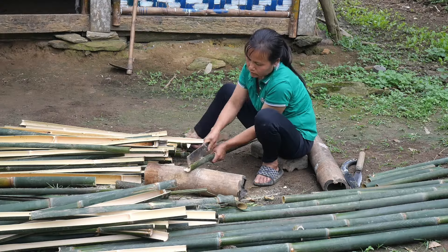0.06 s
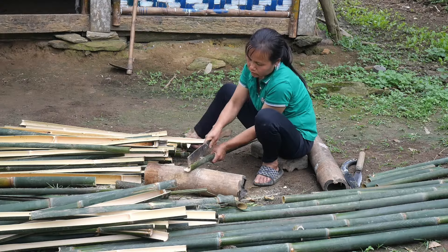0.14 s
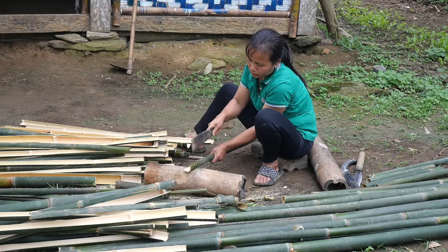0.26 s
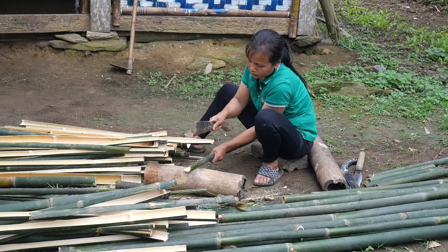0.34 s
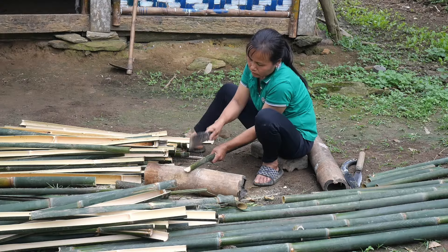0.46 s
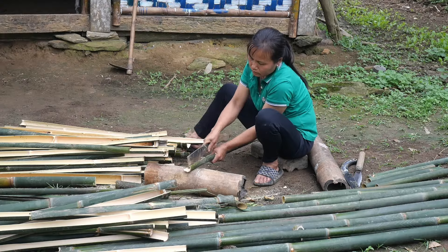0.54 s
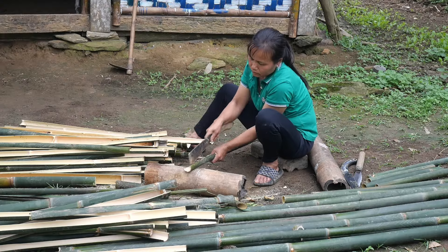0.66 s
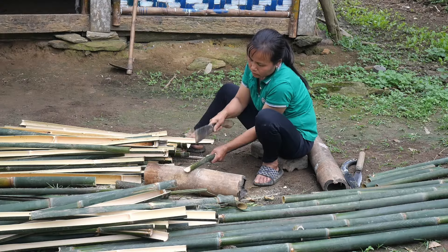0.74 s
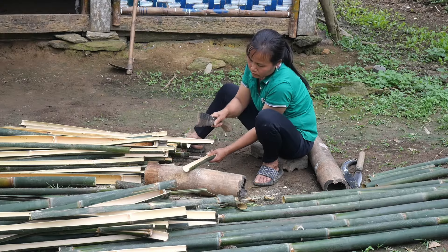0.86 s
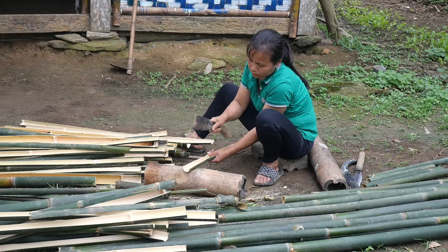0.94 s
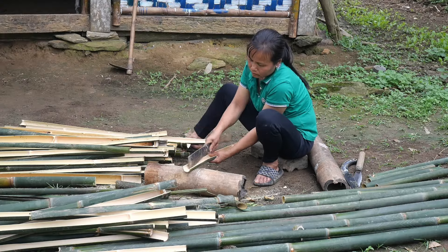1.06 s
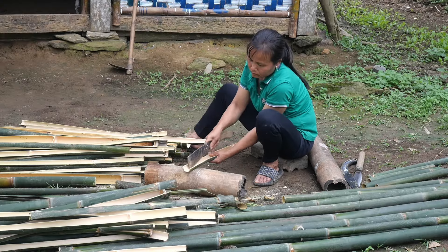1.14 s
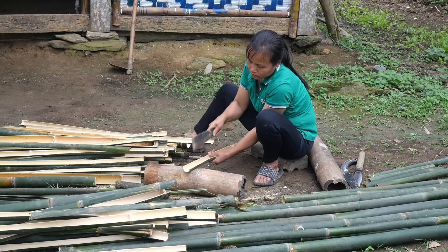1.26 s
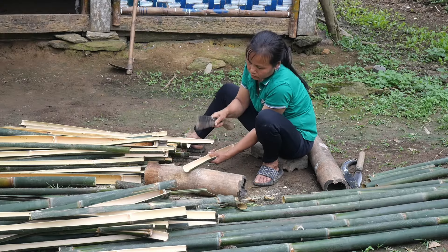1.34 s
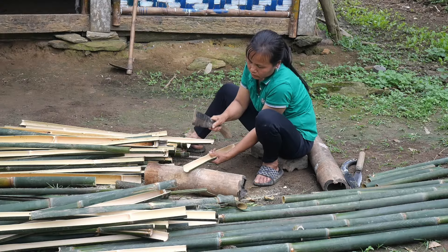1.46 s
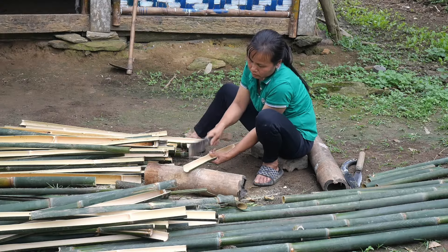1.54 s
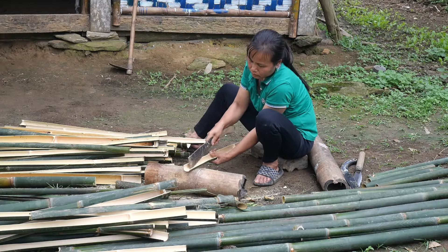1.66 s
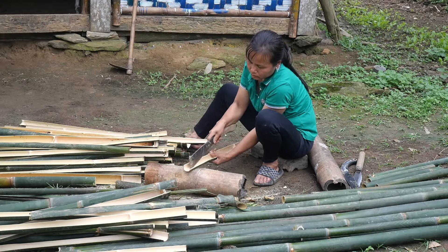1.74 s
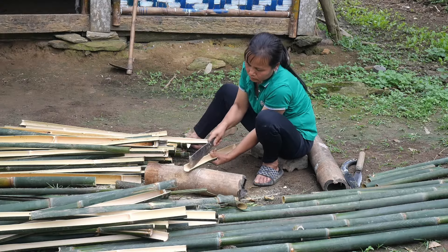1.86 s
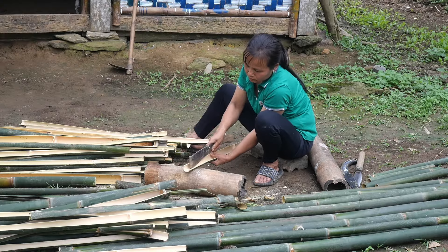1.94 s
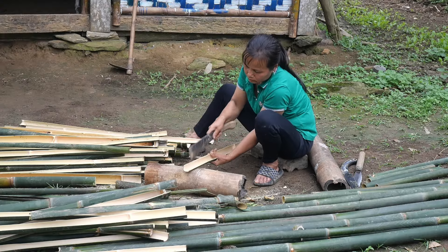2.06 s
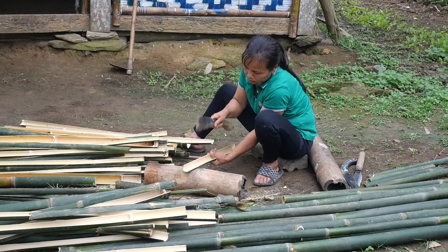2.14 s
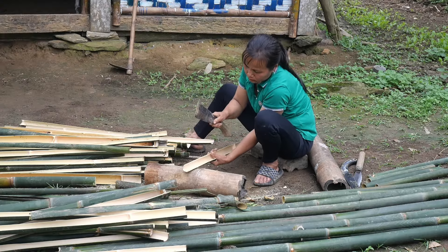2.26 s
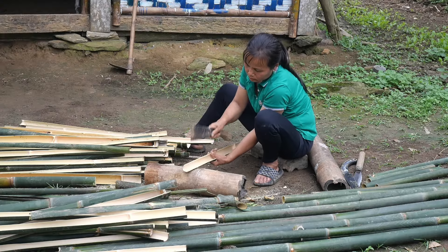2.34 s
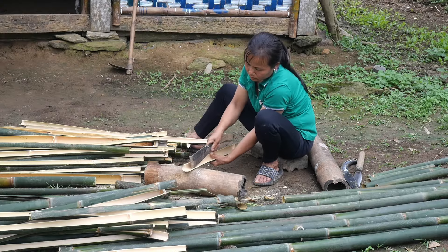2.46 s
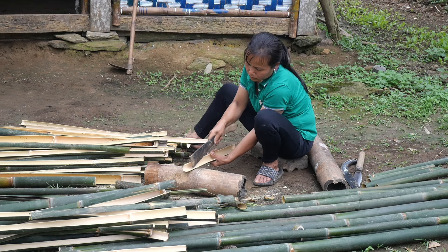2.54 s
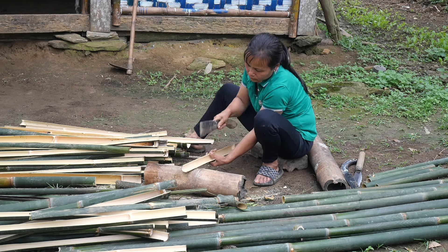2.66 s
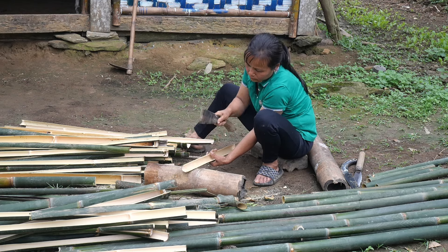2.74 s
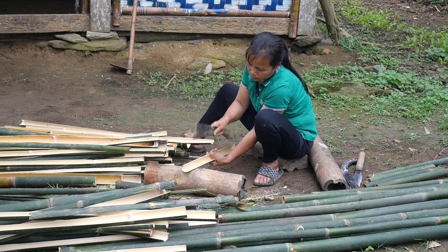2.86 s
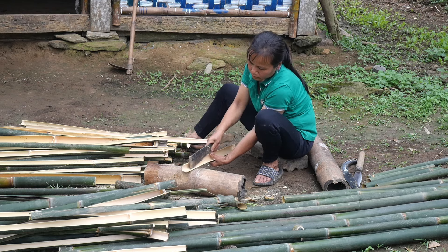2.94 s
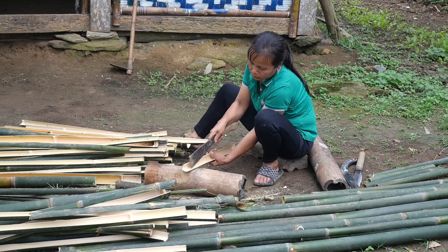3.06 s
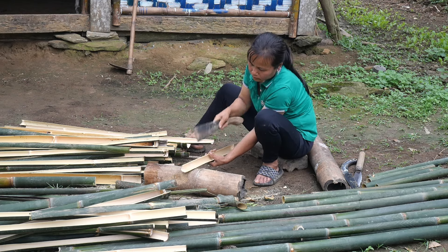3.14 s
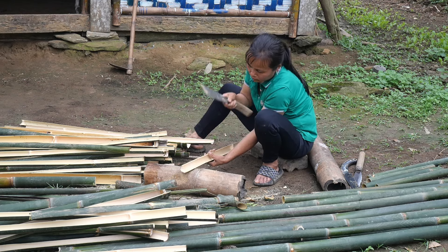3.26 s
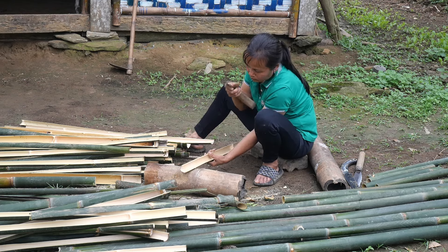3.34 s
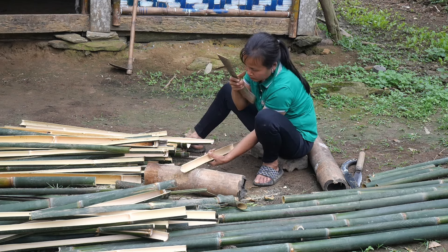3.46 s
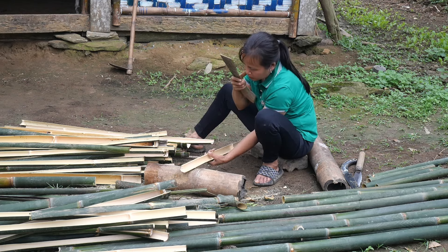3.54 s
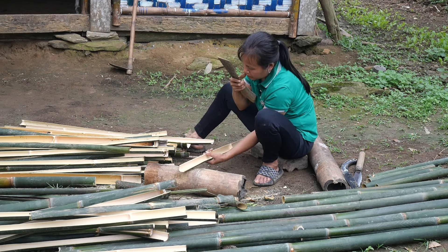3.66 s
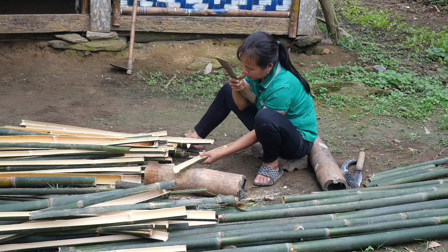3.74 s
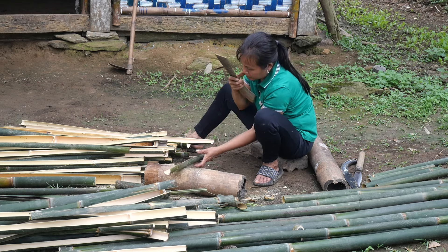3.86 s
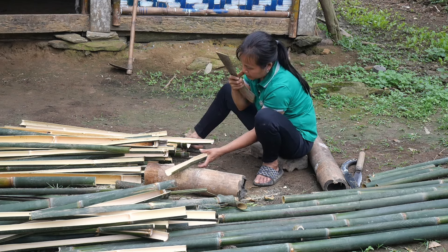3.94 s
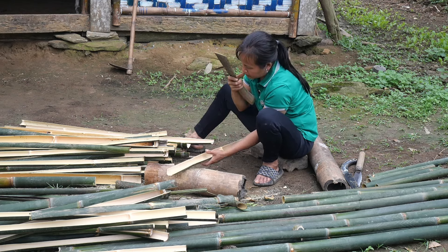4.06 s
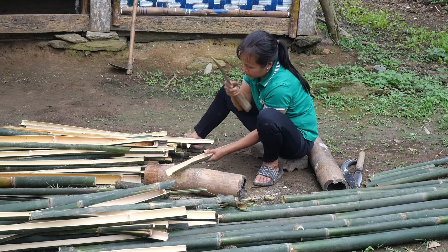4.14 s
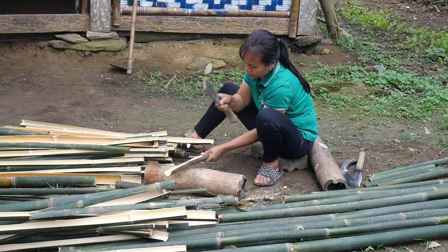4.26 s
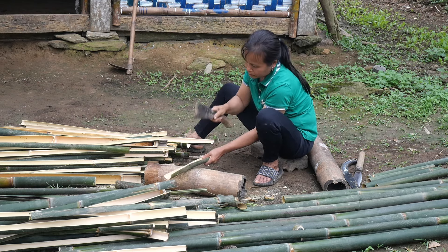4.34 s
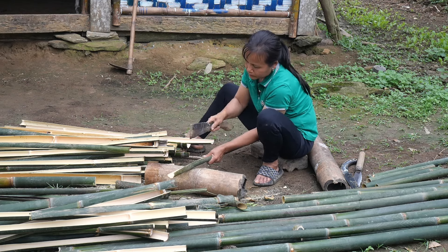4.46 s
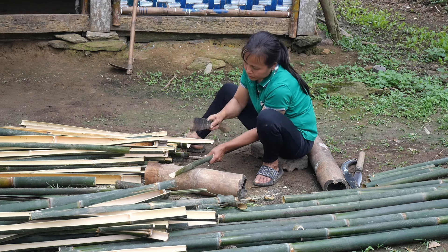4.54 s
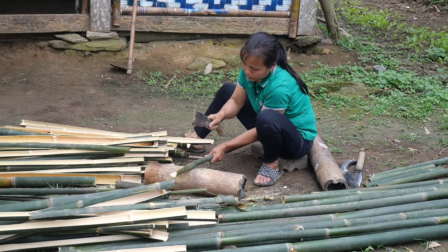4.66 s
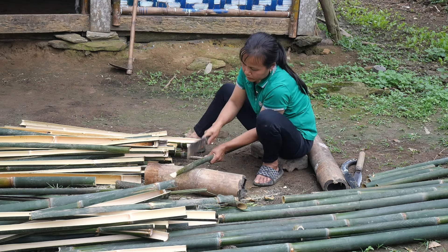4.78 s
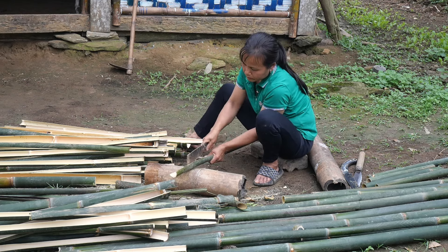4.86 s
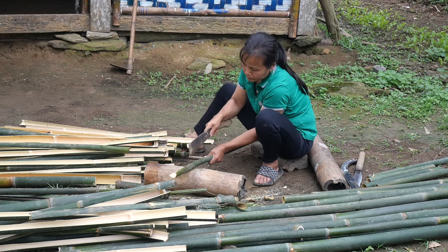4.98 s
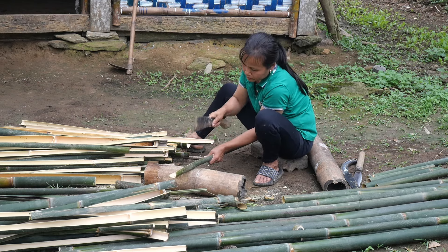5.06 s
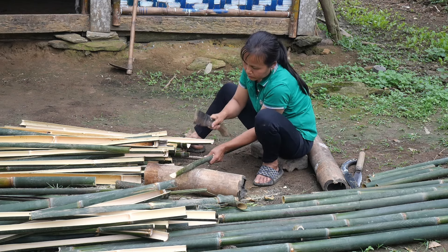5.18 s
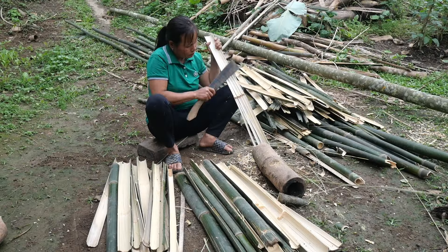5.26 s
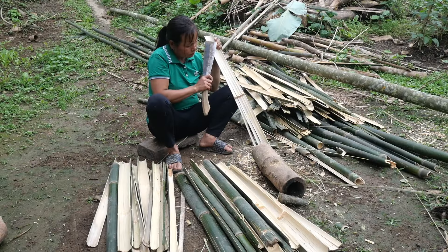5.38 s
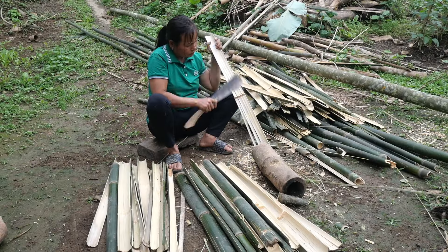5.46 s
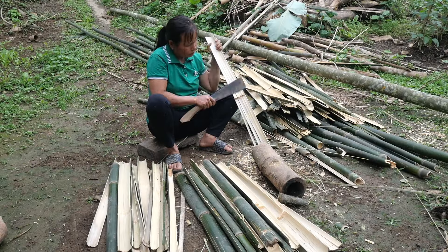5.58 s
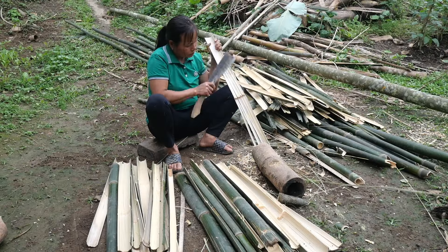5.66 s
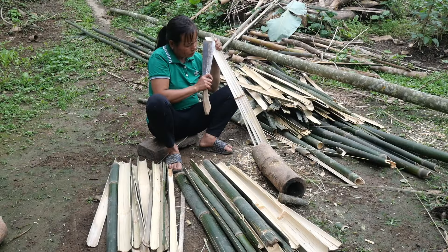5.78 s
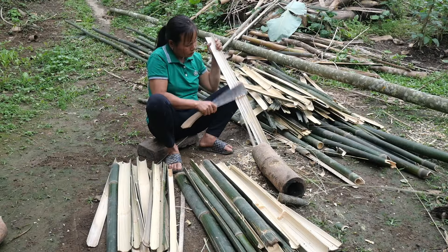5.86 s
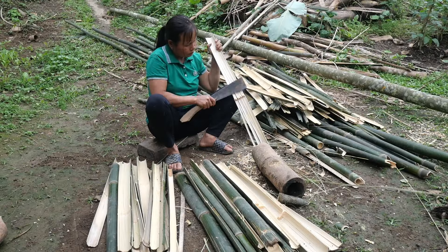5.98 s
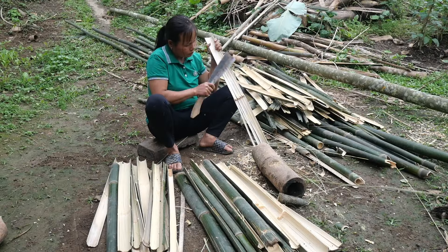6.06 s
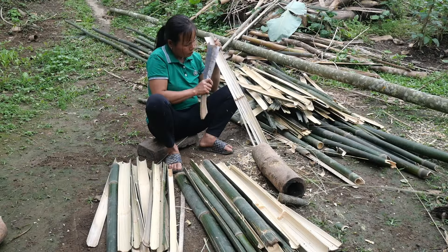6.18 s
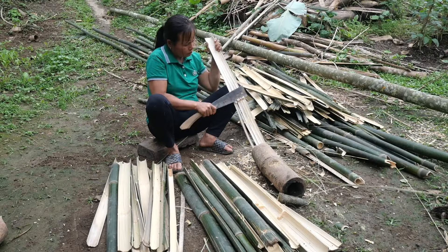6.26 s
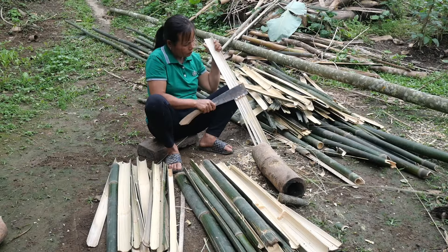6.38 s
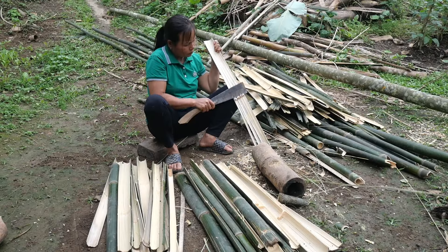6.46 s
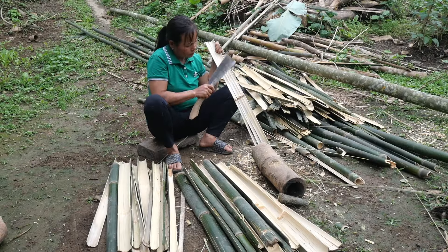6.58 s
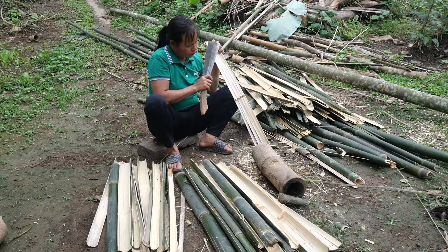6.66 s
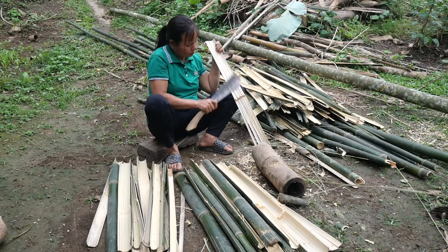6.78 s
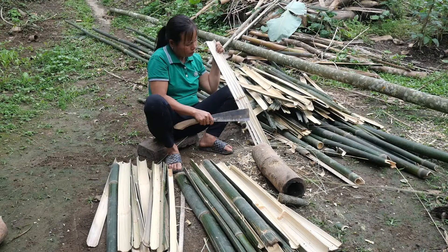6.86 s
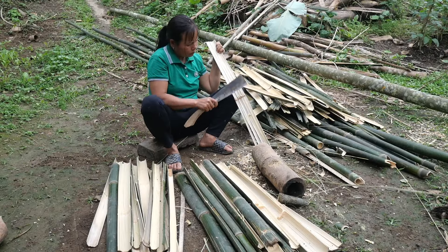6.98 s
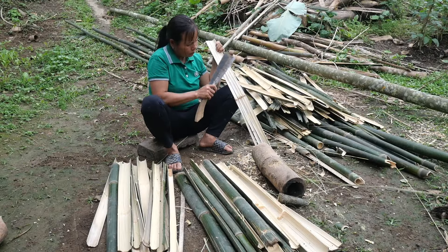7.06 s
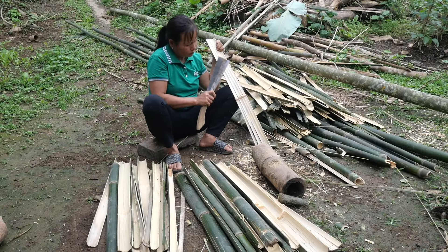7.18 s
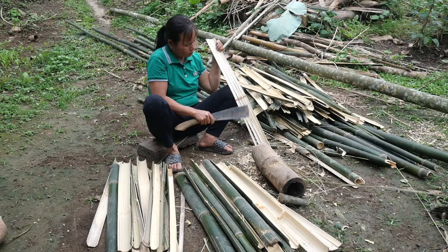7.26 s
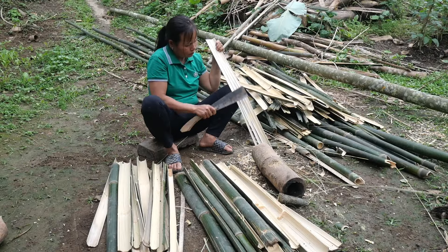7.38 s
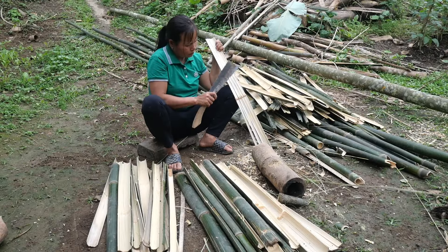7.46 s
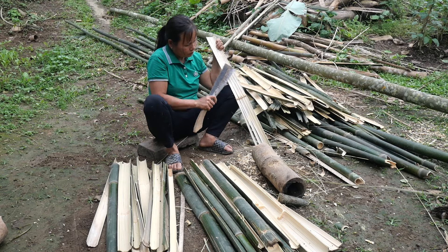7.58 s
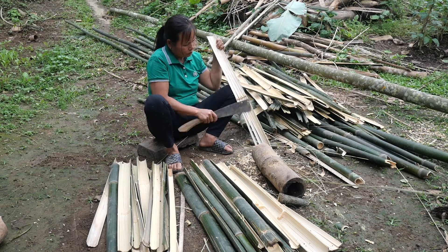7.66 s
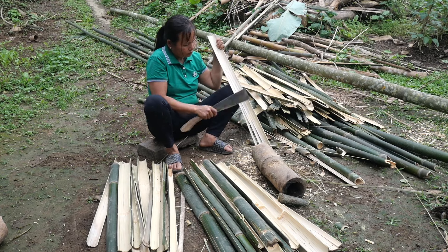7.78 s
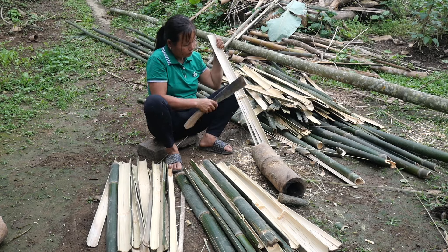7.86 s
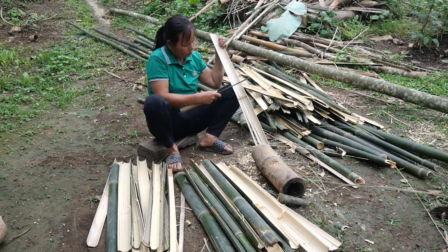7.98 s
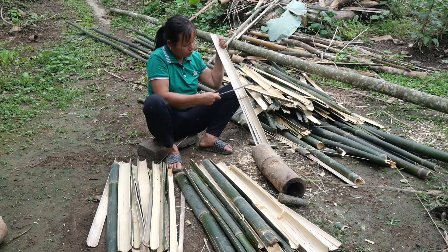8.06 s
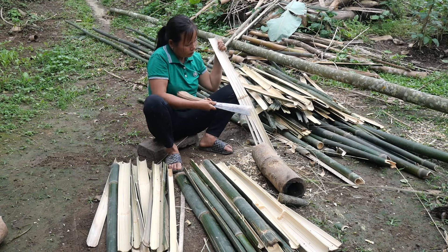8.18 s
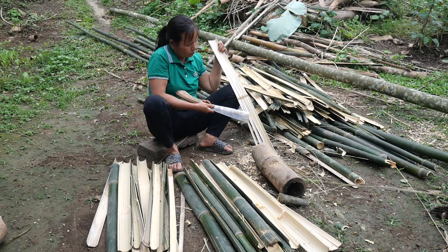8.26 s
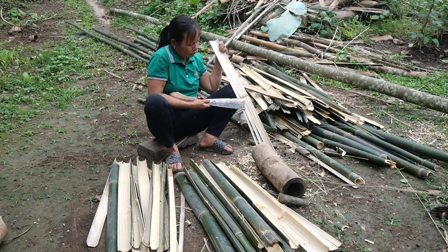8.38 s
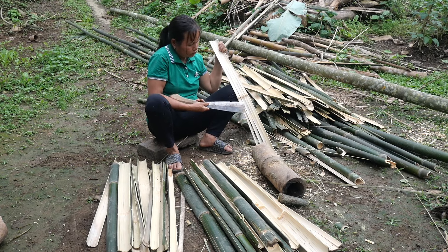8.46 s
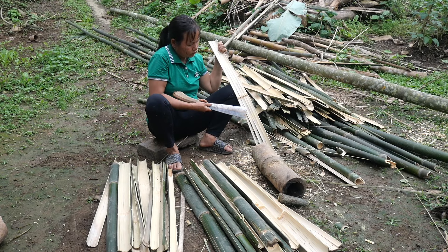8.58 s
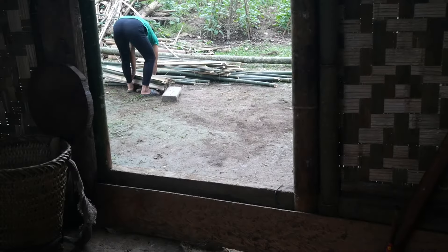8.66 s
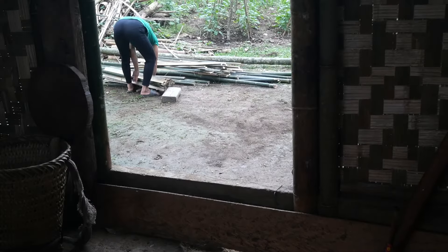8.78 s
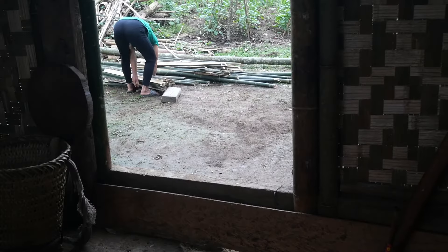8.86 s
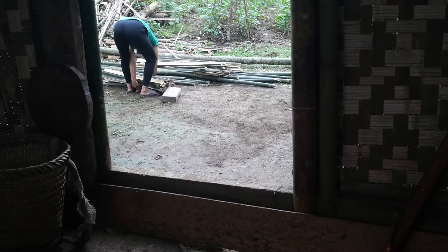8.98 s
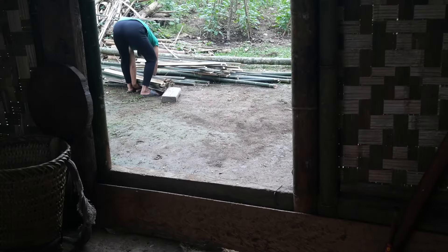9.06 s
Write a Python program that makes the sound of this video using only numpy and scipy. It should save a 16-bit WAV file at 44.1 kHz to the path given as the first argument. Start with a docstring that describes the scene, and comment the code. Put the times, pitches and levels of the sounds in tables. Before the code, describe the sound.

Firm bamboo chops with a short slap off a house front, near cricket chirps, then cane splitting amid insect hiss and a sudden quieter close.

```python
"""A bamboo slat is chopped on a hollow log; a house front slaps back each blow, a rooster and a bird call
far off, one cricket chirps near and another trills far away. From 5.5 s a standing cane is split under a
hissing insect chorus that is gone by 8.3 s; thin wavering tones last to 8.75 s, then a doorway's quiet air follows.
Blows are shaped noise (fibres), decaying sines (ring) and scattered noise (echo); gentler ones ring more.
Scrapes, taps and bumps are band-passed grains, callers gliding sines, air, chorus and tones filtered noise."""
import sys
import numpy as np
from scipy import signal
from scipy.fft import rfft, irfft, next_fast_len
from scipy.io import wavfile
from scipy.ndimage import uniform_filter1d

SR = 44100
rng = np.random.default_rng(int(sys.argv[2]) if len(sys.argv) > 2 else 0)


def file_out(sig):
    """Save sig as 16-bit WAV at sys.argv[1]."""
    # one column per channel
    cols = np.atleast_2d(sig).T
    # limit, then scale
    lim = np.clip(cols, -1, 1)
    pcm = np.round(lim * 32767).astype(np.int16)
    wavfile.write(sys.argv[1], SR, pcm)


N = 401751
T = np.arange(N) / SR
PILE_S, DOOR_S = 5.46, 8.865  # start of the cane pile's and the doorway's background


def amp(db):
    """Decibels to gain."""
    return 10 ** (np.asarray(db) / 20)


def unit(x):
    """Scale to rms 1."""
    return x / np.sqrt(np.mean(x ** 2))


def pan(db):
    """Left and right gains for a left-over-right level difference."""
    gains = amp(np.array([[db], [-db]]) / 2)
    return unit(gains)


def fade(t, t60):
    """Exponential decay from t = 0, 60 dB down after t60 seconds."""
    return (t >= 0) * amp(-60 * np.maximum(t, 0) / t60)


def between(start, end, ramp):
    """Gate with straight ramps, centred on start and end (s)."""
    return np.clip(np.minimum(T - start, end - T) / ramp + .5, 0, 1)


def colour(x, points):
    """Minimum-phase filter through (f/Hz, level/dB) points, by folding the cepstrum."""
    size = next_fast_len(x.shape[-1] + 2048, True) * 2
    point_hz, point_db = np.transpose(points)
    f = np.maximum(np.fft.rfftfreq(size, 1 / SR), 1)
    gain_db = np.interp(np.log(f), np.log(point_hz), point_db)
    cepstrum = irfft(np.log(amp(gain_db)))
    cepstrum[1:size // 2] *= 2
    cepstrum[size // 2 + 1:] = 0
    response = np.exp(rfft(cepstrum))
    return irfft(rfft(x, size) * response)[..., :x.shape[-1]]


def band(x, hz, width_hz):
    """One resonance, applied twice for steep skirts; width_hz is that of a single pass."""
    b, a = signal.iirpeak(min(hz, SR / 3), hz / min(width_hz, SR / 4), SR)
    return signal.lfilter(b, a, signal.lfilter(b, a, x))


def air(size, apart_hz):
    """Stereo noise: channels alike in the bass, ever less related above apart_hz."""
    mid, side = rfft(rng.standard_normal((2, size)))
    alike = np.clip(0.77 / (1 + (np.fft.rfftfreq(size, 1 / SR) / apart_hz) ** 2), 0, 1)
    mid, side = mid * np.sqrt(1 + alike), side * np.sqrt(1 - alike)
    return unit(irfft(np.array([mid + side, mid - side]), size))


def walk(rate_hz, size=N):
    """Random curve of rms near 1: new targets at rate_hz joined by straight lines."""
    k = max(int(SR / rate_hz), 1)
    steps = np.repeat(rng.standard_normal(size // k + 2), k)
    return unit(uniform_filter1d(steps, k))[:size]


def add(out, x, s):
    """Mix x into out at time s."""
    i = int(s * SR)
    a, b = max(i, 0), min(i + x.shape[-1], N)
    out[:, a:b] += x[..., a - i:b - i]


def chopping():
    """A slat cut on the log, about three metres from the house front."""
    # blows: t/s, level/dB, bite length/s, bass/dB, treble/dB
    chops = [(0.0795, -21, 0.0054, 2.5, 1), (0.5938, -21.5, 0.0072, 2, -0.5),
             (1.15, -20, 0.0045, -0.5, -.5), (1.6618, -23, 0.0073, 1.5, 2),
             (2.4945, -18, 0.0041, -4.5, -.5), (3.0148, -22.5, 0.0053, 0.5, 3),
             (4.407, -45.5, 0.0095, 0, -6), (4.897, -21, 0.0049, -3.5, 1), (5.3742, -19.5, 0.0046, -3, -1)]
    # breaking fibres: f/Hz, level/dB
    chop_crack = [(40, -27), (140, -12.5), (220, -11.5), (350, -4), (700, -9.5), (1300, -3), (2000, -6),
                  (3600, 2.5), (5000, -3), (6500, -7.5), (10000, -10.5), (15500, -15.5)]
    # ring of slat and log: f/Hz, level/dB, t60/s
    slat_modes = [(82, -27.5, 0.086), (152, -19.5, 0.074), (309, -26.5, 0.27), (363.5, -10, 0.077),
                  (799, -22.5, 0.2), (892, -22.5, 0.19), (1164, -18.5, 0.21), (1254, -18.5, 0.14),
                  (1420, -6, 0.057), (1860, -13.5, 0.059), (2440, -15.5, 0.13), (2870, -18, 0.12),
                  (3470, -7, 0.046), (3870, -7, 0.0073), (4800, -8.5, 0.055)]
    house = dict(wall_s=0.01624, clutter_db=-5.5, t60=0.059, late_db=-12.5, late_t60=0.28, boom_db=-27,
                 tone=[(300, 0.5), (1100, 7.0), (2500, 1.5), (6000, 2.0), (15000, 4.5)])
    return blows(chops, chop_crack, slat_modes, house, lead_in_db=-44.5, echo_db=-1.5,
                 middle_share=0.64, grain_db=1.5, pan_db=1.5)


def splitting():
    """A standing cane split beside a heap of poles that scatters the sound."""
    # strokes: t/s, level/dB, bite length/s, bass/dB, treble/dB
    splits = [(5.6022, -18, .004, 2.5, 0.5), (5.9942, -14.5, 0.0038, 1.5, 5.5),
              (6.384, -18.5, 0.0037, -4, 1), (6.9242, -20, 0.0022, -5, 6),
              (7.3665, -35.5, 0.011, -5.5, 1.5), (7.463, -49, 0.0047, -5, 5.5),
              (7.7555, -32, 0.0048, -1.5, 5), (8.4695, -42, 0.0042, -4, 6.5),
              (8.738, -34.5, 0.0053, -7, 3.5)]
    # breaking fibres: f/Hz, level/dB
    split_crack = [(40, -23.5), (140, -9), (200, -12), (330, -3.5), (600, -7.5), (850, 0), (2000, -5),
                   (3100, 0.5), (5000, -3.5), (7500, -10), (10000, -8), (15500, -11)]
    # ring of the cane: f/Hz, level/dB, t60/s
    cane_modes = [(139, -24.5, 0.067), (283, -17, 0.081), (374, -19, 0.22), (433, -16.5, 0.076),
                  (772, -17, 0.15), (796, -20, 0.12), (1036, -17, 0.08), (1198, -14.5, 0.2),
                  (1517, -18, 0.076), (1890, -14.5, 0.085), (2840, -9.5, 0.048), (3130, -13.5, 0.043),
                  (3900, -9.5, 0.04), (5945, -11, 0.033), (8120, -21, 0.055), (9720, -10.5, 0.037),
                  (11500, -26, 0.073)]
    heap = dict(wall_s=0.0101, clutter_db=4.0, t60=0.16, late_db=-6, late_t60=0.29, boom_db=-27.5,
                tone=[(300, 1), (1100, 0.4), (2500, -0.74), (6000, -0.2), (15000, 1)])
    return blows(splits, split_crack, cane_modes, heap, lead_in_db=-38.5, echo_db=-0.56,
                 middle_share=.05, grain_db=1.5, pan_db=0.5)


def blows(table, crack, modes, place, lead_in_db, echo_db, middle_share, grain_db, pan_db):
    """A faint noise swells up just before each blow; fibres burst for a few ms, bamboo rings, the yard answers."""
    # gentleness: distance below a firm blow, soft-limited to +-1
    firm_db, gentle_range_db = -19.5, 10.5
    # changes at gentleness 1; dulling is per octave above the corner
    gentle_ring_db, gentle_echo_db, gentle_hollow_db = 6.5, 3, 1
    gentle_dull_db, gentle_corner_hz = 2.5, 1300
    lead_in_max_db = -9  # relative to the bite
    out, lead = np.zeros((2, N)), SR // 20
    t = (np.arange(SR // 2) - lead) / SR
    mode_hz = np.array(modes)[:, 0]
    octaves_up = np.log2(np.maximum(mode_hz / gentle_corner_hz, 1))
    for s, db, bite_s, bass_db, treble_db in table:
        gentle = np.tanh((firm_db - db) / gentle_range_db)

        # the lead-in noise keeps a steady level, up to its cap
        lead_in_gain = amp(min(lead_in_db - db, lead_in_max_db))
        bite = np.clip(t / 0.0012, 0, 1) / (1 + (np.abs(t) / bite_s) ** 6)
        lead_in = (t < .001) * lead_in_gain * np.exp(-np.abs(t) / (0.018 * np.sqrt(lead_in_gain)))
        force = (bite + lead_in) * amp(grain_db * walk(2500, len(t)))
        fibres = unit(colour(air(len(t), apart_hz=17000) * force, crack)) / np.sqrt(len(t))
        echo_gain = amp(echo_db + gentle * gentle_echo_db) * pan(pan_db)
        echo = echo_gain * surroundings(t, fibres, crack, **place)

        # each blow lands on another spot: chance in level/dB, pitch share, phase/turns
        chance = rng.standard_normal((len(modes), 3)) * [1.2, .004, 1]
        dull_db = gentle * gentle_dull_db * octaves_up
        ring = np.zeros(len(t))
        for (hz, mode_db, t60), (level, detune, turn), dull in zip(modes, chance, dull_db):
            wave = np.sin(2 * np.pi * (hz * (1 + detune) * t + turn))
            ring += amp(mode_db + level - dull) * fade(t, t60) * wave
        # the modes build up while the blade pushes
        ring *= amp(gentle * gentle_ring_db) * np.clip(t / bite_s, 0, 1)

        blow = np.sqrt(bite_s * SR) * (fibres + echo) + ring
        middle_db = middle_share * bass_db + gentle * gentle_hollow_db
        blow = colour(blow, [(450, bass_db), (750, middle_db), (1500, middle_db),
                             (2200, 0), (4700, 0.0057), (6500, treble_db)])
        add(out, amp(db) * blow, s - lead / SR)
    return out


def surroundings(t, fibres, crack, wall_s, clutter_db, t60, late_db, late_t60, boom_db, tone):
    """Scattered crack: nearby clutter, the slap of a wall, a thin late tail, a dull far return."""
    swell = np.clip((t - wall_s) / .0015, 0, 1)
    power = (amp(clutter_db) * fade(t - .003, 0.13)) ** 2
    power += (swell * fade(t - wall_s, t60)) ** 2
    power += (swell * amp(late_db) * fade(t - wall_s, late_t60)) ** 2
    # single reflections make the decay rough
    rays = air(len(t), apart_hz=3000) * np.sqrt(power) * amp(2 * walk(700, len(t)))
    # flat faces mirror this very crack; rough ones return only its colour
    mirrored = signal.fftconvolve(rays, fibres[:1, t >= 0], axes=1)[:, :len(t)]
    echo = unit(mirrored) + unit(colour(rays, crack))
    boom = fade(t - .056, 0.11) * band(air(len(t), apart_hz=2800), 322, 220)
    return (unit(colour(echo, tone)) + amp(boom_db) * unit(boom)) / np.sqrt(len(t))


def handling():
    """Dry strips catch and slip in short grainy scrapes; light taps of the blade ring briefly; the cane bumps."""
    # strips dragged over the log or pulled off the blade: t/s, level/dB, decay time constant/s, f/Hz
    scrapes = [(3.15, -51, 0.081, 3270), (3.87, -56.5, 0.095, 3830), (4.292, -60.5, 0.11, 3660),
               (4.377, -53.5, 0.16, 3800), (7.079, -48.5, .033, 8000), (7.22, -50, .012, 8000),
               (7.446, -44, .014, 6000)]
    # light taps of the blade: t/s, level/dB
    taps = [(2.642, -50.5), (3.619, -52.5), (7.291, -46)]
    # soft low bumps from the cane: t/s, level/dB
    bumps = [(6.208, -57), (8.282, -58.5), (8.348, -55)]
    scrape_width = 1.24  # share of the centre frequency
    tap_s, tap_hz, tap_ring_width_hz, tap_grain_width_hz = 0.019, 2850, 500, 4000
    bump_s, bump_hz, bump_width_hz = 0.0086, 416, 750
    out = np.zeros((2, N))
    for s, db, decay_s, hz in scrapes:
        grains, shape = contact(decay_s)
        add(out, amp(db) * shape * unit(band(grains, hz, scrape_width * hz)), s)
    for s, db in taps:
        grains, shape = contact(tap_s)
        ring = unit(band(grains, tap_hz, tap_ring_width_hz))
        grit = unit(band(grains, tap_hz, tap_grain_width_hz))
        add(out, amp(db) * shape * unit(ring + grit), s)
    for s, db in bumps:
        grains, shape = contact(bump_s)
        add(out, amp(db) * shape * unit(band(grains, bump_hz, bump_width_hz)), s)
    return out


def contact(decay_s):
    """Dry grains, and an envelope that starts fast and dies away."""
    t = np.arange(SR // 2) / SR
    grains = air(len(t), apart_hz=4940) * amp(2.4 * walk(500, len(t)))
    return grains, np.minimum(t / (0.077 * decay_s), 1) * np.exp(-t / decay_s)


def near_cricket():
    """Paired wing strokes, each a short falling note, swell into a chirp on the right."""
    # chirps: t/s, length/s
    chirps = [(.44, 0.12), (1.163, .14), (1.968, 0.15), (2.895, 0.15), (3.661, .134), (4.377, 0.12),
              (5.244, 0.12)]
    chirp_db, swell_s = -34.5, .07
    stroke_s, pair_s, second_s = .0085, .0245, .0108
    out, t = np.zeros((2, N)), np.arange(SR // 80) / SR
    for start, length_s in chirps:
        for k in range(14):
            since = k // 2 * pair_s + k % 2 * second_s
            effort = min(0.18 + since / swell_s, 1)
            hz = 5520 + 110 * effort - 560 * t / stroke_s + 30 * rng.standard_normal()
            swing = np.sin(np.pi * np.minimum(t / stroke_s, 1)) ** 2
            note = swing * np.sin(2 * np.pi * np.cumsum(hz) / SR)
            gain = (since < length_s) * amp(chirp_db + rng.standard_normal()) * effort
            add(out, gain * note, start + since)
    tail_t = np.arange(SR // 8) / SR
    leaves = rng.standard_normal((2, len(tail_t))) * fade(tail_t - .004, 0.082)
    scatter = signal.fftconvolve(out, unit(leaves) / np.sqrt(len(tail_t)), axes=1)[:, :N]
    return out * np.array([[amp(-38.0)], [1]]) + amp(-14.5) * scatter


def far_cricket():
    """An endless trill of paired falling notes, half blurred by distance."""
    phase = np.cumsum(21.0 * (1 + 0.0497 * walk(7.4))) / SR % 1  # about 21 pairs a second
    stroke = np.clip((phase - .15) / .3, 0, 2) % 1
    hz = 4600 - 340 * stroke + 40 * walk(200)
    notes = unit(np.sin(np.pi * stroke) * np.sin(2 * np.pi * np.cumsum(hz) / SR))
    blur = unit(band(air(N, apart_hz=1460), 4425, 430))
    blur = blur * np.sqrt(1 - 0.44 * np.cos(2 * np.pi * phase))
    return amp(-59 + 1.04 * walk(3.01)) * pan(6.0) * (0.43 * notes + blur)


def far_birds():
    """A rooster's long hoarse note and three falling whistles, smeared by the trees on their way."""
    # the crow steps up from an opening note to a held one, then sags and dies away
    open_hz, held_hz, sag_hz_per_s = 582, 638, 60
    step_s, hold_end_s = .24, .52
    crow_db, crow_fade_db_per_s = -64.5, 30
    # the first whistle is already under way at t = 0
    first_s, every_s, whistle_hz, fall_hz_per_s, whistle_db = -.04, .41, 3480, 3600, -65
    dying = np.clip(T - hold_end_s, 0, 3)
    hz = open_hz + (held_hz - open_hz) * between(step_s, 10, .09) - sag_hz_per_s * dying
    phase = 2 * np.pi * np.cumsum(hz * (1 + 0.022 * walk(70))) / SR
    hoarse = amp(-13) * np.sin(1.5 * phase) + amp(4) * fade(T, .4) * np.sin(2.5 * phase)
    beak = np.exp(-((T - hold_end_s) / 0.21) ** 2)  # the overtone comes out as the beak opens
    crow = np.sin(phase) + amp(-5) * beak * np.sin(2 * phase) + hoarse
    out = pan(0) * crow * amp(crow_db - crow_fade_db_per_s * dying)
    t = np.arange(SR // 6) / SR
    for k in range(3):
        hz = whistle_hz - fall_hz_per_s * t + 110 * walk(500, len(t))
        whistle = np.hanning(len(t)) ** .5 * np.sin(2 * np.pi * np.cumsum(hz) / SR)
        add(out, amp(whistle_db) * whistle, first_s + k * every_s)
    trees = unit(air(len(t), apart_hz=1480) * fade(t, 0.21)) / np.sqrt(len(t))
    return out + signal.fftconvolve(out, trees, axes=1)[:, :N]


def chorus():
    """Many insects merge into a hiss; a few narrow, wavering tones sound with it."""
    # hiss: f/Hz, density/dB
    hiss_spectrum = [(2300, -43), (2550, 8), (3200, -8), (4200, -8.5), (6400, -4), (7600, 2.5), (10400, 1),
                     (11300, -22), (16000, -62)]
    # narrow tones: f/Hz, level/dB
    thin_tones = [(2611, -64.5), (3962, -68.5), (5195, -72), (5469, -64.5), (6013, -67.5), (8742, -74)]
    tone_width_hz, tone_waver_db = 95, 2
    hiss = ambience(hiss_spectrum, db=-57.5, waver_db=1.0) * between(PILE_S, 10, 0.057)
    hiss = hiss * np.interp(T, [8.22, 8.3], [1, 0])
    noise = air(N, apart_hz=895)
    tones = np.zeros((2, N))
    for hz, db in thin_tones:
        tones += amp(db + tone_waver_db * walk(3.013)) * unit(band(noise, hz, tone_width_hz))
    return hiss + tones * between(PILE_S, 8.75, 0.041)


def ambience(spectrum, db, waver_db):
    """Coloured stereo noise whose level wavers."""
    return unit(colour(air(N, apart_hz=830), spectrum)) * amp(db + waver_db * walk(4.6))


def scene():
    """The work and the three outdoor backgrounds in turn."""
    # air and far insects by the house, at the cane pile, at the doorway: f/Hz, density/dB
    yard_air = [(25, -20), (60, -2), (140, 0.5), (400, -3), (1000, -5.5), (2200, -11), (3700, -7.5),
                (5500, -13.5), (6600, -7.5), (7300, -2.5), (8200, -12.5), (10000, -17), (14000, -15),
                (16000, -16)]
    pile_air = [(25, -12), (70, -2), (150, 1), (400, 0.5), (900, -3), (2000, -5), (3000, 2), (4300, 8),
                (5600, 2.5), (6500, -0.5), (7600, 4.5), (9000, -9.5), (12000, -12), (16000, -19)]
    door_air = [(30, -11), (100, -5), (250, -2.5), (500, -3.5), (1500, -13), (3800, -10.5), (4400, -5),
                (4800, -5), (5500, 2), (6100, -14), (7300, -9), (10000, -18.5), (15000, -19)]
    yard = ambience(yard_air, db=-63.5, waver_db=0.14) + far_cricket()
    yard = yard * between(-1, PILE_S, 0.043)
    pile = ambience(pile_air, db=-54.5, waver_db=0.07) * between(PILE_S, 8.83, 0.057) + chorus()
    door = ambience(door_air, db=-57.5, waver_db=.4) * between(DOOR_S, 10, .01)
    work = chopping() + splitting() + handling()
    return work + near_cricket() + far_birds() + yard + pile + door


def record(dry):
    """The microphone rounds high peaks (tanh) and cuts the top (steep low-pass)."""
    top_hz, ceiling = 15700, .6
    rounded = ceiling * np.tanh(dry / ceiling)
    low_pass = signal.ellip(10, .2, 70, top_hz, fs=SR, output="sos")
    return signal.sosfilt(low_pass, rounded)


dry = scene()
out = record(dry)
file_out(out)
```